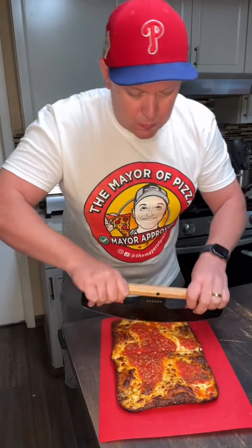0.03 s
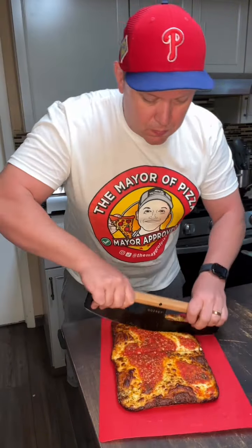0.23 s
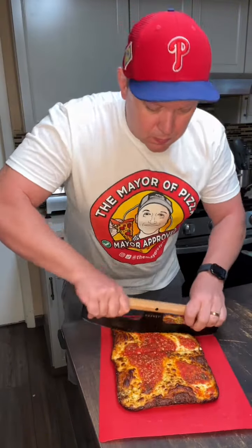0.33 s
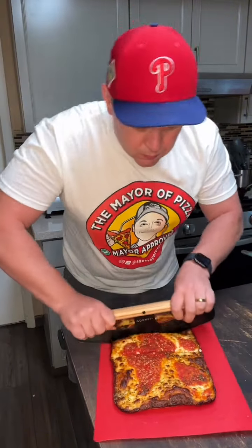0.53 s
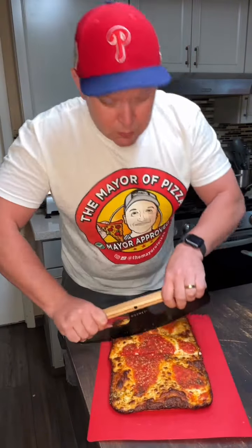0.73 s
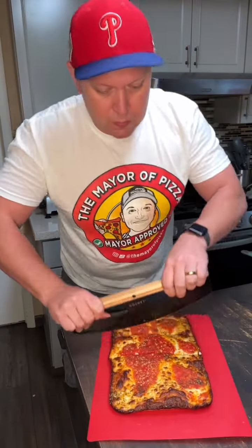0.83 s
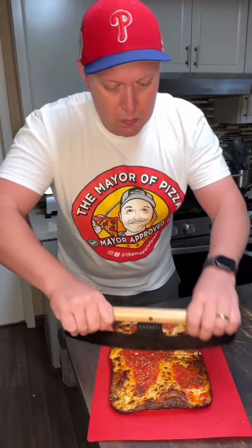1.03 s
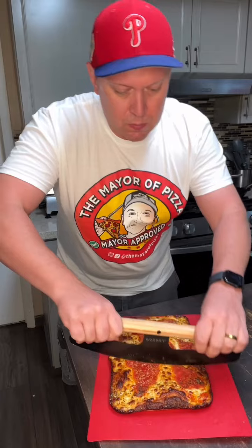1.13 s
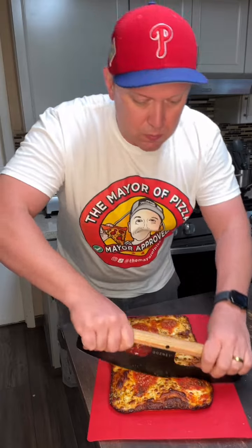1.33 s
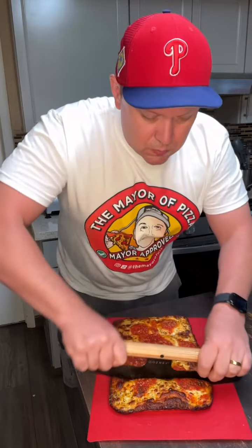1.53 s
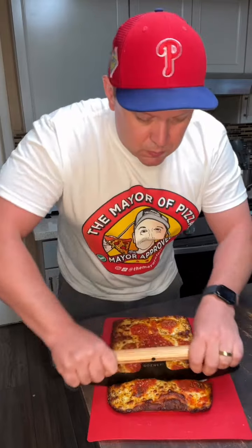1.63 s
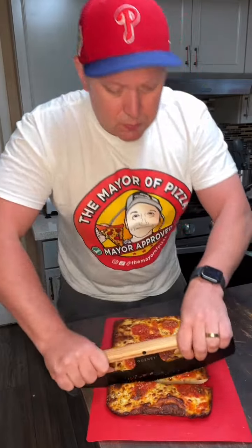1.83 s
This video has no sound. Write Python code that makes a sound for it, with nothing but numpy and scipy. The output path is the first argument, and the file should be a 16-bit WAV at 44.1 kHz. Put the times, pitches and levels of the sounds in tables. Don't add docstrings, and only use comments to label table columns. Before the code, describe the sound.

Crisp pizza crust crunches under a rocker knife in a small, lightly reverberant kitchen, heard closely in stereo by a phone. Faint fridge hum; at 0.2 s the rim cracks and the blade knocks hard on the board, then rocks with dense crackling until 0.65. Quiet with tiny ticks, then a second cut from 1.23, knock at 1.34, strongest crunch around 1.57, sharp snap at 1.7, low soft knock at 1.89.

```python
import sys
import numpy as np
from scipy import signal
from scipy.fft import rfft, irfft, next_fast_len
from scipy.io import wavfile
from scipy.ndimage import uniform_filter1d, map_coordinates

SR = 44100
rng = np.random.default_rng(int(sys.argv[2]) if len(sys.argv) > 2 else 0)


def voltage_ratio(level):
    return 10 ** (np.asarray(level, float) / 20)


def to_wav(s):
    ch = np.atleast_2d(s).T
    pcm = np.round(np.clip(ch, -1, 1) * 32767)
    wavfile.write(sys.argv[1], SR, pcm.astype(np.int16))


N = 83790
TOP_HZ = 15900

# f/Hz, level/dB, t60/s
BOARD_MODES = [
    [(179.7, -5.5, 0.088), (250, -4.5, 0.094), (296, -4, 0.12), (334, -3, 0.084), (420, -8.5, 0.058),
     (520.5, 1.5, 0.053), (696, 3.5, 0.039), (762, -7.5, 0.038), (885, -16.5, 0.054), (1008, -13.5, 0.041),
     (2050, -8, 0.027)],
    [(145, -33, 0.082), (169.3, -4.5, 0.097), (332, 4, 0.085), (468.5, -5.5, 0.17), (672, 6, 0.054),
     (702.8, -9, 0.14), (895, -13, 0.047), (1575, -9, 0.033)],
    [(102, -17.5, 0.15), (330.4, -11.5, 0.1), (423.6, -8, 0.12), (506, 1, 0.05), (644, -5.5, 0.05),
     (698, -8, 0.18), (984, -6.5, 0.049), (1209, -14.5, 0.092)],
    [(165.8, -3, 0.087), (290, -3, 0.091), (480, 2, 0.036), (703, -2, 0.036), (960, -4.5, 0.041),
     (1157, -11.5, 0.055), (1413, -16, 0.067), (1635, -15, 0.034), (1840, -13, 0.072)],
]
# f/Hz, level/dB, t60/s
BLADE_MODES = [(1830, -3, .05), (2000, -3, .05), (2160, 0, .09), (2510, -5, .06), (2690, -6, .06),
               (3250, -10, .04)]


def unit(x):
    return x / np.sqrt(np.mean(x ** 2) + 1e-20)


def along(points, hz):
    f, v = np.transpose(points)
    return np.interp(np.log(hz + 1), np.log(f + 1), v)


def wobble(rate):
    knots = rng.standard_normal(int(N * rate / SR) + 4)
    return map_coordinates(knots, [np.arange(N) * rate / SR])


def filtered(x, response):
    m = next_fast_len(N + SR // 2)
    return irfft(rfft(x, m) * response(np.fft.rfftfreq(m, 1 / SR)), m)[..., :N]


def modes(table, damped=1):
    def response(f):
        total = 0
        for k, (hz, db, t60) in enumerate(table):
            loss = 1j * f * np.log(1000) / np.pi / (t60 * damped)
            total = total + (-1) ** k * voltage_ratio(db) * hz * 100 / (hz * hz - f * f + loss)
        return total
    return response


def fridge():
    # f/Hz, level/dB rms
    hum_lines = [(53.8, -60), (113, -67), (150.7, -68), (217, -66), (274.5, -65), (327, -61), (355.3, -74),
                 (473.7, -77), (532.9, -76), (652, -68), (710.6, -74), (769.8, -78), (904, -84),
                 (1130, -85)]
    # f/Hz, level/dB per Hz
    air_spectrum = [(32, 1), (53, -5.5), (80, -2), (330, -8), (1100, -25), (3200, -44), (6500, -38),
                    (16000, -65)]
    t = np.arange(N) / SR
    hum = 0
    for hz, db in hum_lines:
        level = voltage_ratio(db + 3 + 1.5 * wobble(6))
        hum = hum + level * np.sin(2 * np.pi * hz * t + .5 * wobble(4))
    air = filtered(rng.standard_normal((2, N)), lambda f: voltage_ratio(along(air_spectrum, f)))
    return hum + voltage_ratio(-56 + wobble(6.2)) * unit(air)


def cracks():
    cracks_per_s, life_s = 2800, .0008
    spread_db, biggest, clump_db = 3.5, 2.2, 2.1
    size_db = spread_db * np.minimum(rng.exponential(size=N), biggest)
    size = voltage_ratio(size_db + clump_db * wobble(70))
    starts = size * (rng.random(N) < cracks_per_s / SR)
    envelope = signal.lfilter([1], [1, -np.exp(-1 / (life_s * SR))], starts)
    return unit(envelope * rng.standard_normal(N))


def crushing():
    # t/s, crushing level/dB, board drumming above it/dB
    phases = [
        [(.153, -79, -11), (.159, -55, 3), (.18, -47, 3.5), (.2, -36.5, -40), (.215, -74, -1), (.26, -46, 8),
         (.35, -59.5, 11)],
        [(.35, -56, -25), (.368, -44.5, 9), (.4, -37.5, -2.5), (.44, -37, -9), (.5, -40.5, -2), (.535, -54, 9),
         (.56, -42, -4.5), (.63, -72, 4), (.72, -70, -6)],
        [(.72, -87, 7), (.76, -56, 2), (.8, -63.5, -21), (.95, -75, -27), (1.05, -76.5, -7)],
        [(1.215, -104, -15), (1.232, -72, 2), (1.3, -54.5, -4), (1.335, -47.5, -15), (1.36, -56.5, 24),
         (1.445, -55, 6.5)],
        [(1.445, -57, 8), (1.49, -42, -0.5), (1.565, -33, 0.5), (1.625, -38, -6), (1.66, -47, -4),
         (1.69, -61, 20), (1.74, -47.5, 4.5), (1.86, -103, -27)],
    ]
    # f/Hz, level/dB
    crust = [(300, -8), (800, -11), (1400, -7), (2200, 1), (3300, -8), (6000, -7.5), (9000, -12),
             (16000, -20.5)]
    blade_db = -16.5
    damped = .45
    boards = (BOARD_MODES[0], BOARD_MODES[3], BOARD_MODES[3], BOARD_MODES[1], BOARD_MODES[2])
    t, out = np.arange(N) / SR, np.zeros(N)
    for phase, board in zip(phases, boards):
        s, db, drum_db = np.transpose(phase)
        force = voltage_ratio(np.interp(t, s, db, -140, -140))
        grit = cracks()
        gain = np.sqrt(np.mean(force ** 2))
        drum = force * voltage_ratio(np.interp(t, s, drum_db))
        drum_gain = np.sqrt(np.mean(drum ** 2))
        out += force * unit(filtered(grit, lambda f: voltage_ratio(along(crust, f))))
        out += voltage_ratio(blade_db) * gain * unit(filtered(force * grit, modes(BLADE_MODES, damped)))
        out += drum_gain * unit(filtered(drum * grit, modes(board, damped)))
    return out


def snaps(table):
    splinter = .2
    tick = .25
    out, t = np.zeros(N + SR), np.arange(4096) / SR
    for s, db, hz, t60 in table:
        burst = splinter * voltage_ratio(-60 * t / t60) * np.sign(rng.standard_normal(len(t)))
        burst[0] = 1
        ring = signal.lfilter(*signal.butter(2, [hz * .8, hz * 1.25], "band", fs=SR), burst)
        ring[:44] += tick * burst[:44]
        out[round(s * SR):][:len(t)] += voltage_ratio(db) * ring / np.abs(ring).max()
    return out[:N]


def knocks():
    # t/s, level/dB
    places = [
        [(.2023, -10.5), (.208, -7.5), (.2135, -12.5), (.2162, -13), (.2238, -13.5), (.2295, -24), (.2368, -17),
         (.241, -24), (.258, -21.5)],
        [(1.3392, -12.5), (1.3495, -20), (1.365, -26), (1.868, -40), (1.874, -41)],
        [(1.495, -36), (1.533, -19), (1.547, -30), (1.557, -31), (1.563, -17), (1.584, -17), (1.596, -19.5),
         (1.621, -18), (1.632, -23.5), (1.712, -47), (1.728, -46)],
        [(.3975, -21), (.4035, -15.5), (.418, -21.5), (.425, -23), (.4345, -23), (.4495, -20), (.4655, -24),
         (.52, -30), (.556, -35.5), (.654, -33), (.675, -38)],
    ]
    thud_levels = [-2.5, -7, -5, -3.5]
    thud_t60_s, rasp_db, rasp_t60_s = 0.095, -13, 0.047
    contact_s, blade_db = 0.0013, -26
    rasp_band = signal.butter(1, (1030, 4000), "band", fs=SR)
    thud_band = signal.butter(2, (266, 695), "band", fs=SR)
    out, t = np.zeros(N + SR), np.arange(SR // 2) / SR
    blade = [(hz, db + blade_db, t60) for hz, db, t60 in BLADE_MODES]
    for blows, board, thud_db in zip(places, BOARD_MODES, thud_levels):
        for s, db in blows:
            ring = 0
            for hz, level, t60 in board + blade:
                decay = voltage_ratio(level + rng.normal(0, 1.2) - 60 * t / t60)
                ring = ring + decay * np.sin(2 * np.pi * hz * t + rng.normal(0, .25))
            rasp = unit(signal.lfilter(*rasp_band, rng.standard_normal(len(t))))
            rasp = voltage_ratio(rasp_db - 60 * t / rasp_t60_s) * rasp
            thud = unit(signal.lfilter(*thud_band, rng.standard_normal(len(t))))
            thud = voltage_ratio(thud_db - 60 * t / thud_t60_s) * thud
            onset = 1 - np.exp(-t / contact_s)
            out[round(s * SR):][:len(t)] += voltage_ratio(db - 7.5) * (ring + thud + rasp) * onset
    return signal.lfilter(*signal.butter(2, 130, "high", fs=SR), out)[:N]


def counter_shoves():
    # t/s, level/dB, f/Hz, t60/s
    pushes = [(0.217, -23, 76, 0.15), (0.406, -30.5, 62.4, 0.157), (0.494, -34, 79, 0.16),
              (0.678, -31, 78, 0.087), (1.556, -26.5, 91.5, 0.11), (1.622, -28, 86, 0.076),
              (1.73, -64, 85, 0.16)]
    out, t = np.zeros(N + SR), np.arange(SR // 2) / SR
    onset = 1 - np.exp(-t / 0.0087)
    for s, db, hz, t60 in pushes:
        out[round(s * SR):][:len(t)] += voltage_ratio(db - 60 * t / t60) * np.sin(2 * np.pi * hz * t) * onset
    return out[:N]


def last_knock():
    # t/s, level/dB, f/Hz, t60/s
    event = (1.8895, -23.5, 220, 0.3)
    s, db, hz, t60 = event
    out, t = np.zeros(N + SR), np.arange(SR // 2) / SR
    tone = np.cos(2 * np.pi * hz * t + 0.14) + 0.14 * np.cos(4 * np.pi * hz * t)
    out[round(s * SR):][:len(t)] = voltage_ratio(db - 60 * t / t60) * tone
    return out[:N]


def kitchen(x):
    # f/Hz, t60/s
    reverberation = [(100, 0.46), (600, 0.21), (2200, 0.33), (5000, 0.23), (12000, 0.16)]
    late_db, late_stretch = -12.5, 2.4
    step = round(.12 * SR)
    delay = 130
    out = np.zeros((2, N + 2 * SR))
    fade, x = np.sqrt(np.bartlett(2 * step)), np.pad(x, (step, 2 * step))
    for start in range(0, N + step, step):
        hz, t, z = signal.stft(rng.standard_normal((2, SR)), SR, nperseg=256)
        fall_db = -60 * t / along(reverberation, hz)[:, None]
        decay = voltage_ratio(fall_db) + voltage_ratio(late_db + fall_db / late_stretch)
        tail = signal.istft(z * decay, SR, nperseg=256)[1]
        tail = tail / np.linalg.norm(tail[0])
        piece = x[start:start + 2 * step] * fade
        answer = signal.fftconvolve(piece[None], tail, axes=1)
        out[:, start:start + answer.shape[1]] += answer
    return out[:, step - delay:][:, :N]


def scene():
    # t/s, peak level/dB, centre f/Hz, t60/s
    crumb_snaps = [(.159, -41, 5800, 0.008), (0.279, -40, 9100, 0.011), (0.285, -43, 6700, 0.0044),
                   (0.29, -27, 9400, 0.0063), (0.3634, -41, 5500, 0.0076), (0.3707, -35, 3260, .008),
                   (0.3935, -43.5, 2800, 0.0034), (.5422, -22, 5900, 0.0071), (0.5468, -34, 5000, 0.0068),
                   (0.6485, -32, 2300, 0.17), (0.7654, -50, 4960, 0.006), (0.7753, -40, 7750, 0.013),
                   (.7755, -37.5, 9400, 0.011), (.792, -42, 4950, 0.01), (1.0331, -58, 5900, 0.0069),
                   (1.227, -37.5, 5930, 0.008), (1.227, -45.5, 8900, .006), (1.251, -42, 7800, 0.014),
                   (1.262, -46, 5500, 0.008), (1.295, -30, 1110, 0.024), (1.3257, -26, 4300, 0.011),
                   (1.325, -27, 8560, 0.021), (1.33, -30.5, 6800, 0.017), (1.3393, -26, 5150, 0.0066),
                   (1.363, -59, 8000, 0.0042), (1.371, -51, 5500, .005), (1.39, -42, 3800, .006),
                   (1.404, -38.5, 8900, 0.0063), (1.4604, -38, 5500, .008), (1.4953, -35, 4000, 0.014),
                   (1.5476, -20.5, 5500, 0.009), (1.652, -19.5, 5150, 0.0061), (1.7691, -34, 6250, 0.0064)]
    # t/s, peak level/dB, centre f/Hz, t60/s
    sharp_snaps = [(.1935, -19, 6640, 0.0063), (.2014, -14, 3500, 0.015), (.4735, -33, 12500, .003),
                   (.4772, -17, 5100, 0.004), (.4776, -23, 8000, 0.0046), (.5412, -20, 4100, 0.013),
                   (.5435, -27, 8100, 0.0066), (0.6482, -28.5, 4800, 0.0095), (1.2955, -31, 6500, 0.0069),
                   (1.7045, -14, 5860, 0.0049), (1.7047, -37, 11400, 0.0036)]
    # start t/s, end
    # t/s
    open_spans = [(.18, .225), (.478, .506), (1.47, 1.525)]
    open_db = -5
    dry_gain, wet_gain = voltage_ratio([[0], [-2.5]]), voltage_ratio([[-4], [-5]])
    t = np.arange(N) / SR
    blows = knocks() + counter_shoves()
    crunch, crumbs, sharp = crushing(), snaps(crumb_snaps), snaps(sharp_snaps)
    room = kitchen(crunch + voltage_ratio(-4) * blows + voltage_ratio(-4) * (crumbs + sharp))
    steady = (crunch + blows + crumbs) * dry_gain + wet_gain * room + fridge()
    top = filtered(steady[0], lambda f: (f >= 11900) & (f < TOP_HZ))
    gap = filtered(steady[1], lambda f: (f > 5300) & (f < 7800))
    opened = sum((t > a) & (t < b) for a, b in open_spans)
    shut = uniform_filter1d(1 - voltage_ratio(open_db) * opened, size=200)
    return steady - np.array([shut * top, shut * gap]) + (sharp + last_knock()) * dry_gain


def roll_off(x):
    return signal.sosfilt(signal.butter(12, 15900, fs=SR, output="sos"), x)


def record(dry):
    # f/Hz, level/dB
    front = [(24, -17), (40, 1.5), (10000, -0.5), (11500, -5.5), (13000, -14), (16000, -11)]
    # f/Hz, level/dB
    sideways = [(60, -32.5), (300, -15), (1400, -1), (4900, -5), (5500, -12), (7700, -7.5), (8800, 1.5),
                (15500, 5)]

    def pickups(f):
        both = np.array([voltage_ratio(along(front, f)) + 0j, -1j * voltage_ratio(along(sideways, f))])
        return (f < TOP_HZ + 400) * both

    mid, side = filtered(dry, pickups)
    return roll_off(np.array([mid + side, mid - side]))


dry = scene()
out = record(dry)
to_wav(out)
```